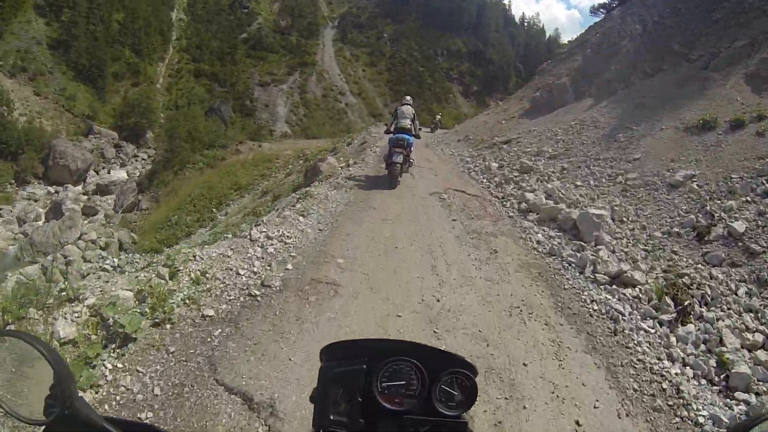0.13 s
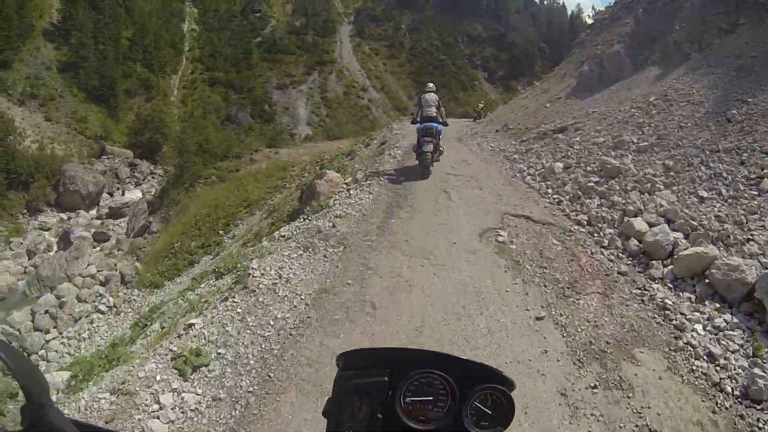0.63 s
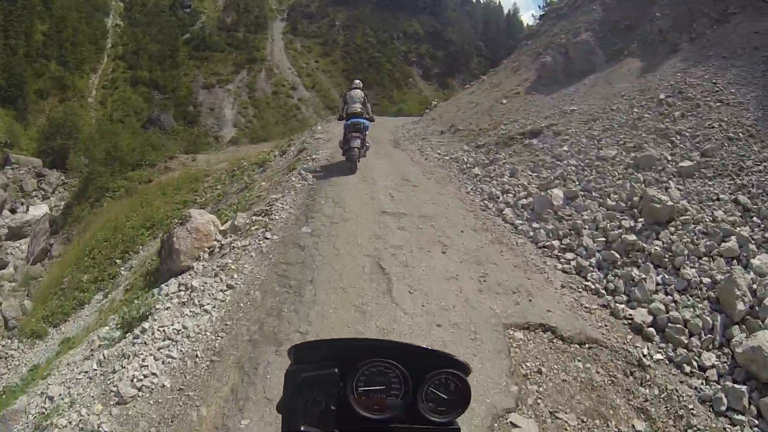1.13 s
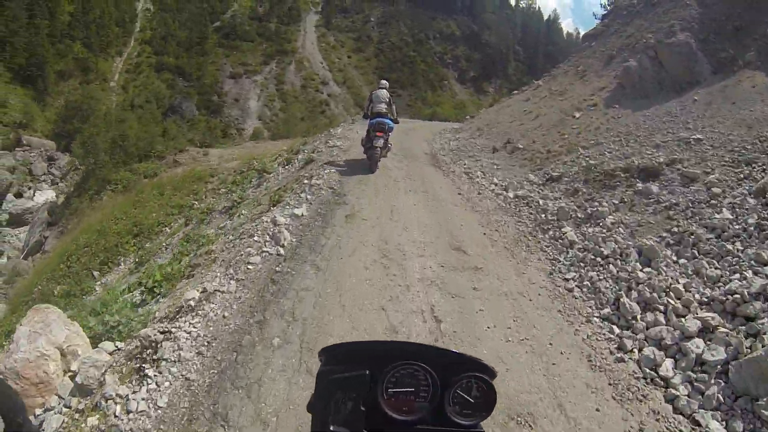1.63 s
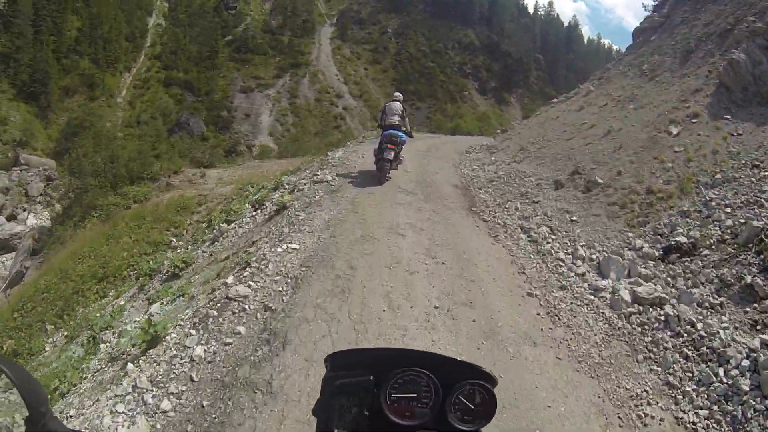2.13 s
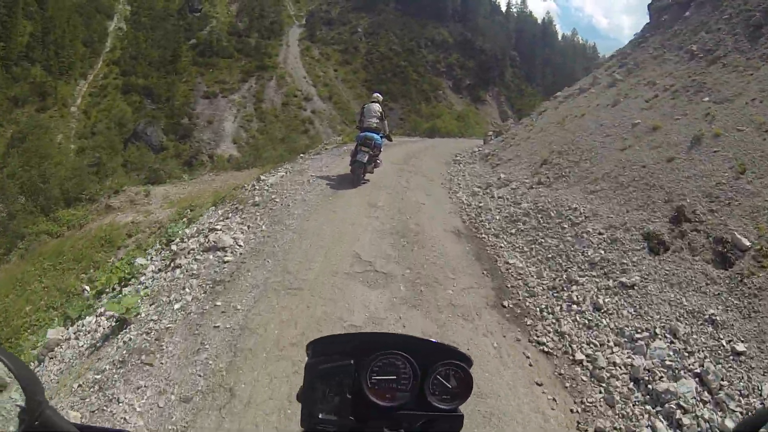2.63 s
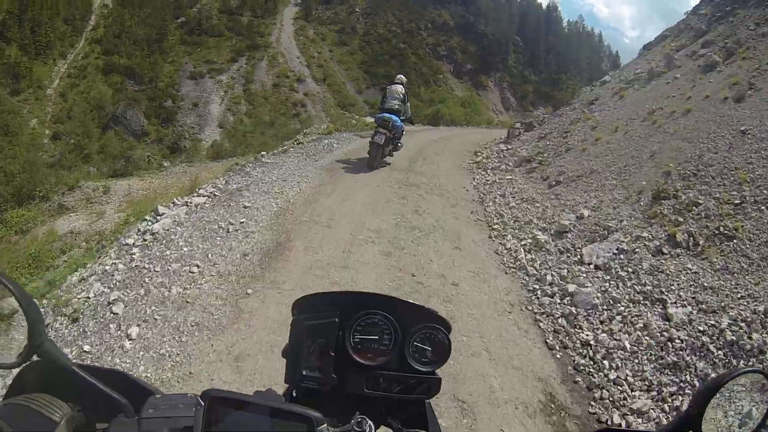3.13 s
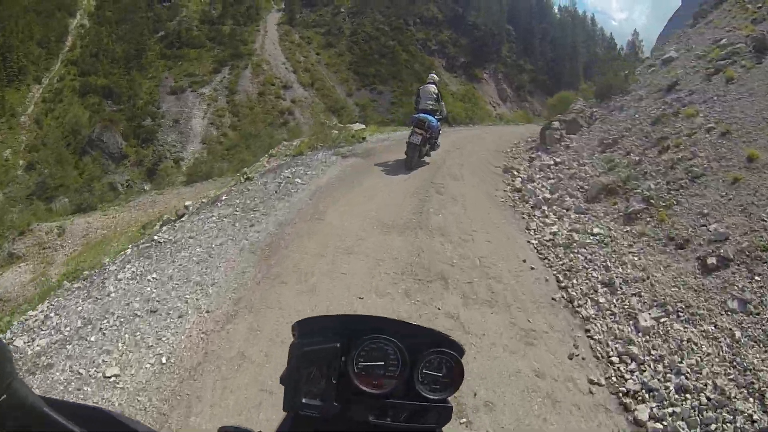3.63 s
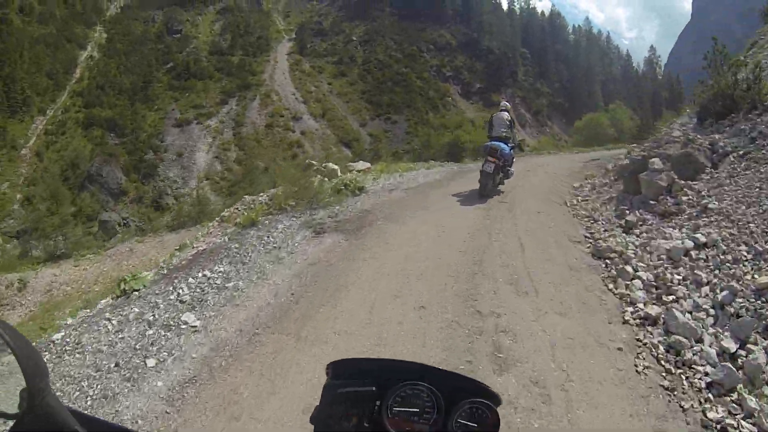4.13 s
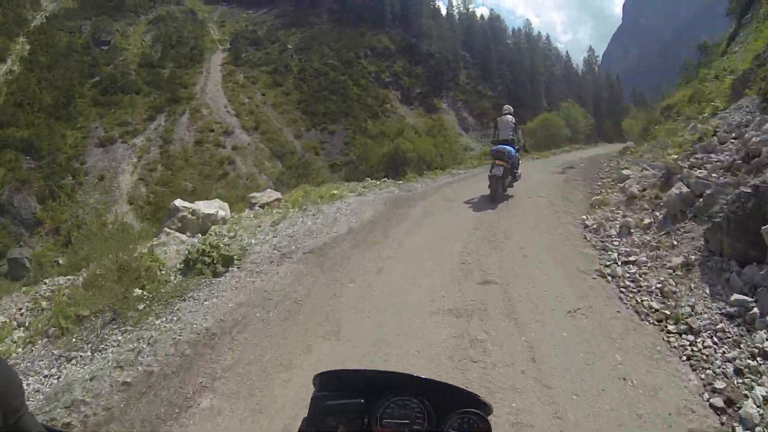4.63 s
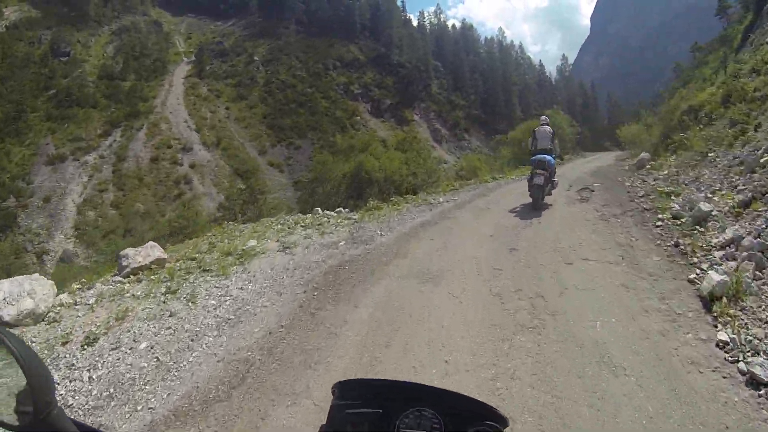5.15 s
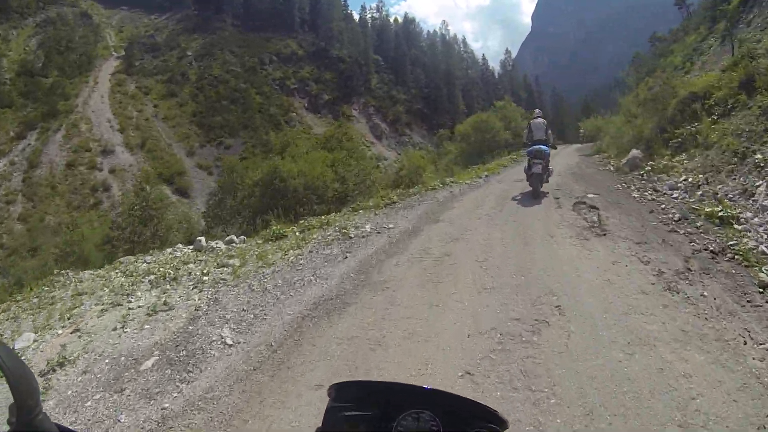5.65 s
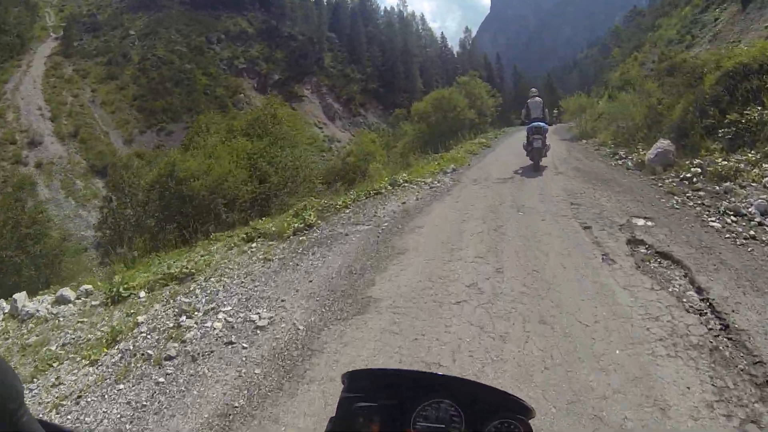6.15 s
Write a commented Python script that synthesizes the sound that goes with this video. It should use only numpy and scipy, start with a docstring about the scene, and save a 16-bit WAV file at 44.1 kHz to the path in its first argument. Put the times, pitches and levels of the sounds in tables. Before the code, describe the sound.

A low motorcycle engine pulls with a rising gear whine, shifts up with clunks, then thumps slowly on a gravel track, muffled and bumpy.

```python
"""Flat-twin motorcycle on gravel, inside a camera case

A camera in a closed case rides on a flat-twin motorcycle that climbs a gravel track behind a second one.
Filtered firing pulses make the own engine, which pulls, is shifted up and thumps on at low revs, and the
leader's drone. Sines locked to the firings make the gear whine; noise makes valve gear, tyres, stones, shift
clunks, wind and soft thumps; decaying sines make the bumps. The case resonances colour it all."""
import sys
import numpy as np
from scipy import signal
from scipy.fft import rfft, irfft
from scipy.io import wavfile
from scipy.ndimage import uniform_filter1d

SR = 44100
rng = np.random.default_rng(int(sys.argv[2]) if len(sys.argv) > 2 else 0)


def to_linear_factor(level_db):
    """Convert decibel levels (scalar or array-like) to linear amplitude factors."""
    exponent = np.asarray(level_db, float) / 20
    return 10 ** exponent


def unload_wav(signal):
    """Save mono or channel-first audio to the path in sys.argv[1] as 16-bit WAV at rate SR, clipped to [-1, 1]."""
    wavfile.write(
        sys.argv[1],
        SR,
        np.round(np.clip(np.atleast_2d(signal).T, -1, 1) * 32767).astype(np.int16),
    )


N = 276507
TIME = np.arange(N) / SR

# rolling noise: (time [s], clatter and tyre hiss ahead of the case wall [dB], its upper middle [dB],
# its treble [dB], rumble [dB]); middle and treble relative to the lower bands
ROLLING = [(0, -47, 1, 1.5, -45.5), (.4, -45, 0.5, 1.5, -45.5), (.8, -47, 0, 3, -51),
           (2, -45.5, 1, 3, -53.5), (2.6, -43.5, 1, 0.5, -48.5), (2.9, -45.5, 2, 1, -50),
           (3.05, -50, 3.5, 2.5, -49.5), (3.4, -49, 4.5, 2.5, -45), (4, -48.5, 4, 2, -45.5),
           (5.4, -49, 1, 2, -46.5), (6.27, -47.5, 3, 1.5, -43)]


def curves(table):
    """Columns of a table as sample-rate curves."""
    s, *columns = np.transpose(table)
    return [np.interp(TIME, s, c) for c in columns]


def unit(x):
    """Scale to rms 1."""
    return x / np.sqrt(np.mean(x ** 2))


def noise():
    """White noise."""
    return rng.standard_normal(N)


def causal(x, db_of_hz, size=16384):
    """Minimum-phase filter from a gain curve in dB, by folding the cepstrum."""
    hz = np.arange(size // 2 + 1) * SR / size + 1
    ceps = irfft(db_of_hz(hz) * np.log(10) / 20)
    ceps[1:size // 2] *= 2
    ceps[size // 2 + 1:] = 0
    impulse = irfft(np.exp(rfft(ceps)))
    return signal.fftconvolve(x, impulse)[:N]


def colour(x, points):
    """Filter by (Hz, dB) points, rms 1 out."""
    hz, db = np.transpose(points)
    return unit(causal(x, lambda f: np.interp(np.log(f), np.log(hz), db)))


def walk(rate_hz):
    """Random levels held 1 / rate_hz s and slewed twice, rms 1."""
    k = int(SR / rate_hz)
    held = np.repeat(rng.standard_normal(N // k + 1), k)
    return unit(uniform_filter1d(uniform_filter1d(held, k), k)[:N])


def revs():
    """Own firing rate in Hz; the driveline winds up and lets go, so the revs surge."""
    # pull, clutch in, higher gear, without the surge: (time [s], firing rate [Hz])
    own_rate = [(0, 42.28), (.3, 43.7), (.53, 43.97), (.7, 45.2), (1.1, 45.4), (1.5, 46.8), (1.7, 47.8),
                (1.92, 49.1), (2.33, 51.35), (2.44, 51.35), (2.58, 52), (2.718, 53.6), (2.82, 44.44),
                (2.96, 38.56), (3.07, 34.7), (3.25, 31.28), (3.8, 32.07), (5.0, 33.27), (5.6, 33.92),
                (6.05, 34.76), (6.27, 34.97)]
    # driveline surge: (start [s], end [s], first crest [s], period [s], swing [Hz])
    surge = (.6, 1.82, .71, .325, .85)
    start_s, end_s, crest_s, period_s, swing_hz = surge
    on = np.clip(np.minimum(TIME - start_s, end_s - TIME) / 0.081, 0, 1)
    return curves(own_rate)[0] + swing_hz * on * np.cos(2 * np.pi * (TIME - crest_s) / period_s)


def firings(hz, jitter_ms, scatter_db, uneven_db):
    """One pulse per firing; the two cylinders differ and each burn has its own time and size."""
    turns = np.cumsum(hz) / SR  # firings so far, not crank turns
    at = np.flatnonzero(np.diff(np.floor(turns)))
    time_chance, size_chance = rng.standard_normal((len(at), 2)).T
    late = (time_chance * jitter_ms * SR / 1000).astype(int)
    cylinder = (-1) ** np.arange(len(at))
    pulses = np.zeros(N)
    pulses[np.clip(at + late, 0, N - 1)] = to_linear_factor(scatter_db * size_chance + uneven_db * cylinder)
    return pulses, turns


def own_exhaust(pulses):
    """Firing pulses through the own pipe, hushed while the throttle is shut."""
    # own exhaust: (time [s], level [dB])
    exhaust_level = [(0, -50.5), (.4, -49), (.7, -51), (1.9, -49), (2.35, -52.5), (2.9, -56), (3.0, -68),
                     (3.27, -68), (3.35, -46.5), (3.7, -48), (5.1, -45.5), (6.27, -47)]
    # own exhaust colour: (frequency [Hz], relative level [dB])
    own_pipe = [(20, -50.5), (33, -11.5), (50, 2), (70, 1), (100, -1.5), (150, -11), (210, -17.5),
                (250, -6.5), (285, 2), (312, -9), (345, -36.5), (450, -29.5), (515, -29.5), (560, -22),
                (620, -31), (1000, -37.5), (3000, -110)]
    return to_linear_factor(curves(exhaust_level)[0] + 1.3 * walk(9)) * colour(pulses, own_pipe)


def leader():
    """Firing pulses of the leading engine through its own pipe."""
    # leading engine: (time [s], firing rate [Hz], exhaust level [dB])
    leader_engine = [(0, 42.74, -69), (.25, 42.88, -48), (.75, 44.24, -51.5), (1.25, 45.38, -50.5),
                     (2.0, 47.02, -53.5), (2.5, 48.14, -52), (3.1, 49.16, -50.5), (3.8, 48.63, -51.5),
                     (4.25, 49.66, -51), (5.0, 52.28, -48.5), (5.3, 54.28, -47), (5.75, 56.6, -46.5),
                     (6.27, 59.18, -46.5)]
    # its exhaust colour: (frequency [Hz], relative level [dB])
    leader_pipe = [(25, -26), (48, 0.5), (98, 4.5), (120, -2), (150, 7), (180, 0), (210, -18.5), (250, -8),
                   (300, -15.5), (400, -11), (500, -20.5), (700, -22), (900, -53), (3000, -110)]
    hz, db = curves(leader_engine)
    pulses, _ = firings(hz, jitter_ms=.07, scatter_db=.7, uneven_db=.5)
    return to_linear_factor(db + 2.1 * walk(5)) * colour(pulses, leader_pipe)


def frame_rock(turns):
    """The crank rocks the frame once per firing, most when the engine lugs in the higher gear."""
    # frame rocking: (time [s], level [dB])
    rock_level = [(0, -46), (.5, -62), (1.0, -54), (2.6, -50.5), (2.9, -53), (3.25, -70), (3.5, -44.5),
                  (3.8, -34.5), (4.1, -38), (4.42, -41.5), (4.85, -32), (5.15, -36.5), (5.4, -38.5),
                  (5.7, -36.5), (6.27, -39)]
    swing = unit(np.cos(2 * np.pi * turns + 0.062 * walk(2)))
    return to_linear_factor(curves(rock_level)[0] + 0.92 * walk(7)) * swing


def rumble():
    """Rolling rumble: low noise of wavering level."""
    # rumble colour: (frequency [Hz], relative level [dB])
    rumble_colour = [(20, -8.5), (40, 12), (90, -1.5), (170, -7.5), (290, -3.5), (340, -28.5), (600, -44),
                     (3000, -87)]
    rumble_db = curves(ROLLING)[3]
    return to_linear_factor(rumble_db + 2.35 * walk(22)) * colour(noise(), rumble_colour)


def wind_and_thumps():
    """A wavering breeze on the case with bell-shaped low bursts on top: wind gusts and soft thumps of jolts."""
    # bell-shaped bursts, wind gusts and soft thumps: (crest time [s], level [dB], length [s])
    burst_table = [(.3, -41.5, 0.16), (.57, -31.5, 0.045), (0.832, -42.5, 0.064), (1.332, -48.5, 0.17),
                   (1.837, -45.5, 0.21), (2.72, -46.5, 0.13), (2.96, -38.5, 0.082), (4.209, -38, 0.11),
                   (4.44, -35.5, 0.067), (4.83, -42, .2), (5.261, -33, 0.065)]
    # wind colour: (frequency [Hz], relative level [dB])
    wind_colour = [(4, -9.5), (13, -2), (20, -5), (30, -10), (60, -17.5), (150, -28), (400, -86.5),
                   (3000, -110)]
    breeze_db, waver_db = -51, 2.5
    bursts = sum(to_linear_factor(db) * np.exp(-((TIME - s) / length_s) ** 2) for s, db, length_s in burst_table)
    return (to_linear_factor(breeze_db + waver_db * walk(9)) + bursts) * colour(noise(), wind_colour)


def clatter(turns):
    """Valve gear and tyre noise that beats with the firings; each band flickers alone."""
    # hiss colour outside the case: (frequency [Hz], relative level [dB])
    hiss_colour = [(200, -19.5), (350, -12), (600, -16.5), (900, -22.5), (1500, -14.5), (3000, -24),
                   (5000, -35), (8000, -40), (12000, -45.5), (15000, -48.5)]
    wall_db = -8  # the case wall holds back airborne sound
    hiss_db, middle_db, treble_db, _ = curves(ROLLING)
    edges_hz = [150, 1150, 1900, 2600, 4200, 6000, 8000, 11000, 16000]
    band_db = [0] * 2 + [middle_db] * 2 + [treble_db] * 4
    out = 0
    for lo, hi, db in zip(edges_hz, edges_hz[1:], band_db):
        band = signal.sosfilt(signal.butter(3, [lo, hi], "band", fs=SR, output="sos"), noise())
        every_firing = 0.084 * np.cos(2 * np.pi * turns + walk(2.59))
        every_second = 0.09 * np.cos(np.pi * turns + walk(3.5))
        flicker = to_linear_factor(db + 0.66 * walk(12) + 0.4 * walk(3.03))
        out = out + band * (1 + every_firing + every_second) * flicker
    return to_linear_factor(hiss_db + wall_db) * colour(out, hiss_colour)


def ring():
    """Noise in one narrow metallic resonance, which comes up around the shift."""
    # ring: (time [s], level [dB])
    ring_level = [(0, -67.5), (2.2, -67.5), (2.5, -63), (3, -65), (3.5, -66.5), (3.9, -68.5), (4.3, -85),
                  (6.27, -85)]
    centre_hz, width_hz = 2234, 39
    b, a = signal.iirpeak(centre_hz, centre_hz / width_hz, fs=SR)
    return to_linear_factor(curves(ring_level)[0]) * unit(signal.lfilter(b, a, noise()))


def whine(turns):
    """Gear teeth mesh at a fixed order; the pulsing crank adds sidebands at whole and half firings."""
    # tooth mesh and sidebands: (multiple of the firing rate [1])
    mesh_orders = [24, 24.5, 25, 25.5, 26, 26.5, 27, 28]
    # their strengths: (relative level [dB])
    mesh_db = [-11, -13, 0, -7.5, -5, -20, -13, -18]
    # the gearbox housing passes less above its resonance: (frequency [Hz], gain [dB])
    housing = [(900, 0), (1320, 0), (1385, -8), (1700, -12)]
    # grows with the pull, drops as the clutch opens, ahead of the case wall: (time [s], level [dB])
    whine_level = [(0, -62), (.6, -60), (.72, -47.5), (1.55, -48), (1.7, -47), (2.2, -45), (2.33, -42),
                   (2.718, -40), (2.726, -49), (2.92, -51), (2.97, -85)]
    wall_db = -13
    wander_db, wander_rad, spread_rad = 1., .2, 1.2
    lines = 0
    for order, db in zip(mesh_orders, mesh_db):
        # the sidebands are out of step, as the crank changes speed as well as load
        offset_rad = spread_rad * (order - 25) ** 2
        level = to_linear_factor(db + wander_db * walk(12))
        lines = lines + level * np.sin(2 * np.pi * order * turns + offset_rad + wander_rad * walk(25))
    return to_linear_factor(curves(whine_level)[0] + wall_db + 0.89 * walk(9.6)) * colour(lines, housing)


def jolts():
    """Each stone sets the bike swinging for a cycle or two: deep thuds and lighter knocks."""
    # jolts: (time [s], level [dB], pitch [Hz])
    jolt_table = [(0.185, -37, 34), (0.219, -36.5, 215), (0.294, -32, 40), (0.329, -25.5, 20),
                  (0.371, -36.5, 204), (.495, -30, 72), (0.546, -27, 11), (0.591, -36, 300),
                  (0.989, -31, 40), (1.308, -34, 49), (1.698, -36.5, 243), (2.845, -33.5, 96),
                  (2.915, -37, 146), (2.95, -35, 20.6), (3.18, -41, 250), (5.25, -32, 20.94),
                  (6.16, -35, 48.6)]
    decay_ms = 14.3  # at 100 Hz; deeper thuds last longer
    out = np.zeros(N)
    for s, db, hz in jolt_table:
        t = np.clip(TIME - s, 0, None)
        decay = np.exp(-1000 * t * np.sqrt(hz / 100) / decay_ms)
        out -= to_linear_factor(db) * np.sin(2 * np.pi * hz * t) * decay
    return out


def shift():
    """Clunks of clutch and selector: noise bursts that start at once and die away in ms."""
    # gear shift clunks: (time [s], level [dB])
    clunks = [(2.805, -49), (2.871, -48), (2.912, -49)]
    envelope = np.zeros(N)
    for s, db in clunks:
        envelope += to_linear_factor(db) * (TIME > s) * np.exp(-np.abs(TIME - s) / 0.0084)
    return envelope * colour(noise(), [(300, -2), (1000, -1), (3000, -6), (8000, -26), (15000, -48)])


def scene():
    """Own bike, leader, road and wind, ahead of the case resonances."""
    pulses, turns = firings(revs(), jitter_ms=.09, scatter_db=.9, uneven_db=.8)
    engines = own_exhaust(pulses) + leader() + frame_rock(turns)
    road_and_wind = rumble() + wind_and_thumps() + jolts()
    mechanics = clatter(turns) + ring() + whine(turns) + shift()
    return (engines + road_and_wind + mechanics)[None]


def case(x):
    """The camera case rings and dips in the mids and treble."""
    # peaks and dips of the case: (centre [Hz], width [Hz], gain [dB])
    case_modes = [(997, 80, 8), (1146, 118, -3.5), (1261.5, 199, 12.5), (1407, 148, 12.5), (1606, 177, 10),
                  (1913, 158, -12), (2214, 436, 7), (2530, 140, -4.5), (3100, 324, 5.5), (4870, 410, 9),
                  (6510, 100, 7), (7320, 130, 5.5), (9500, 390, 2)]
    return causal(x, lambda f: sum(db / (1 + (2 * (f - hz) / width_hz) ** 2)
                                   for hz, width_hz, db in case_modes))


def top_cut(x):
    """Nothing passes above the cut-off."""
    return signal.sosfilt(signal.butter(12, 15170, fs=SR, output="sos"), x)


def record(dry):
    """The sound inside the case, with a 3 ms fade at the end."""
    heard = case(dry[0])
    heard *= np.clip((TIME[-1] - TIME) / .003, 0, 1)
    return top_cut(heard[None])


dry = scene()
out = record(dry)
unload_wav(out)
```